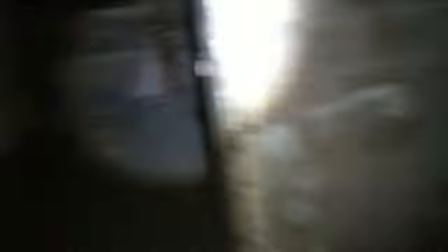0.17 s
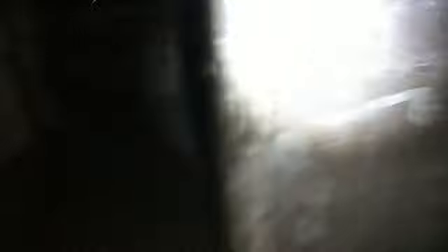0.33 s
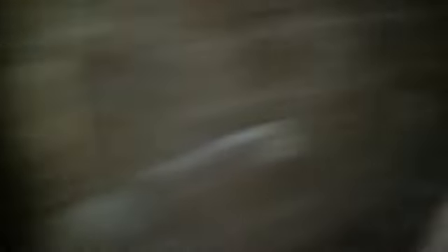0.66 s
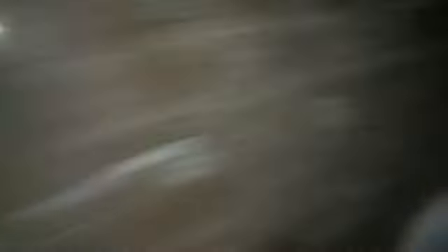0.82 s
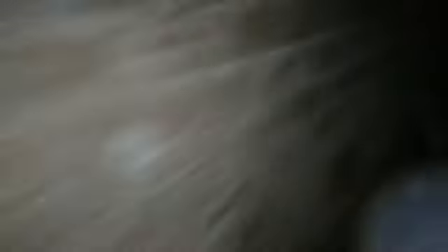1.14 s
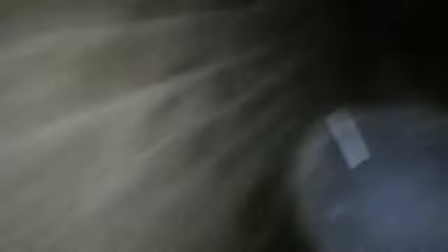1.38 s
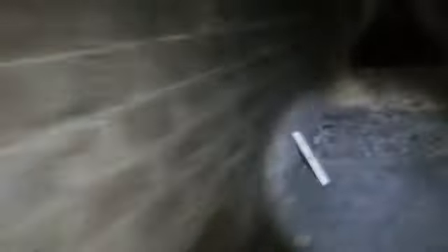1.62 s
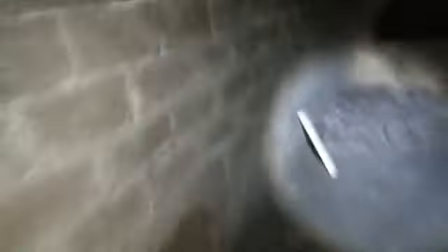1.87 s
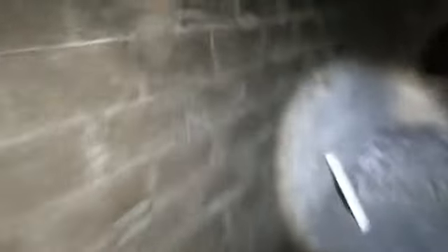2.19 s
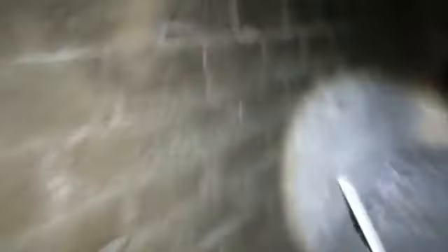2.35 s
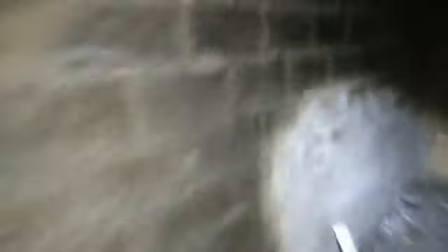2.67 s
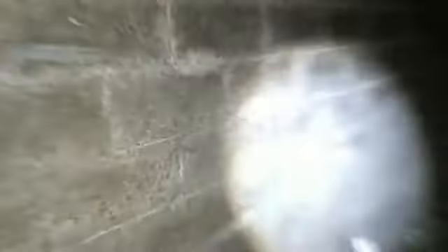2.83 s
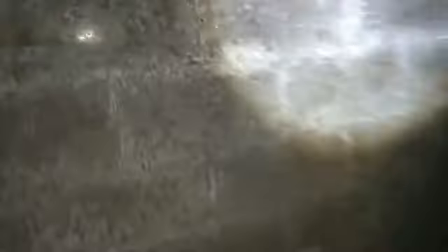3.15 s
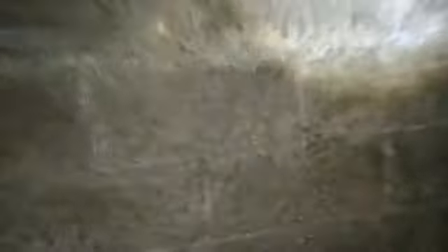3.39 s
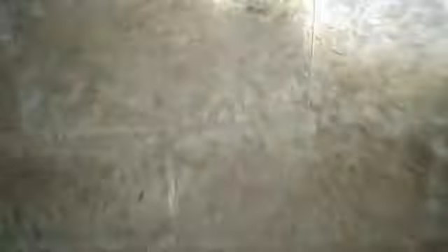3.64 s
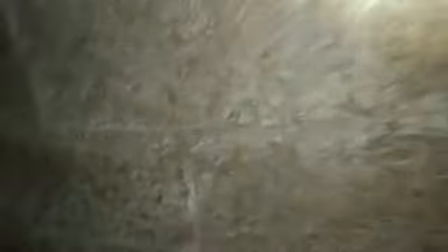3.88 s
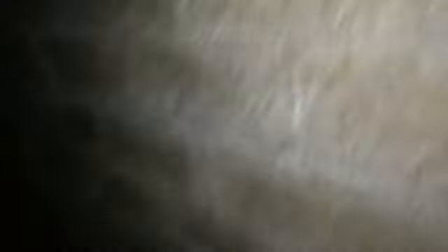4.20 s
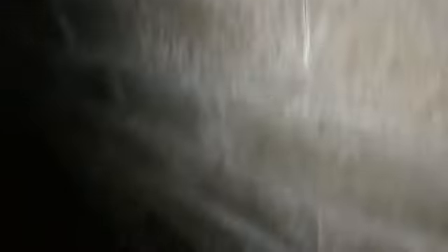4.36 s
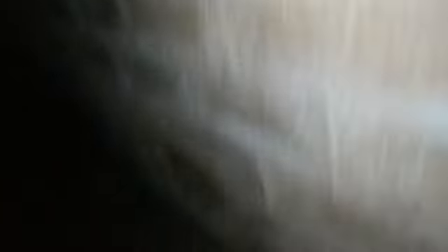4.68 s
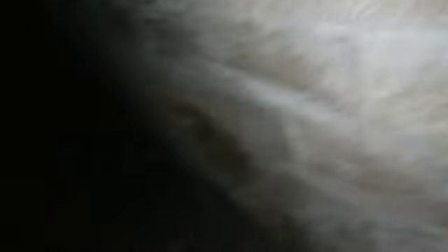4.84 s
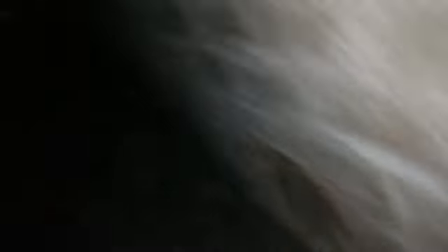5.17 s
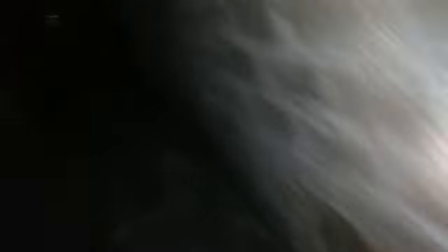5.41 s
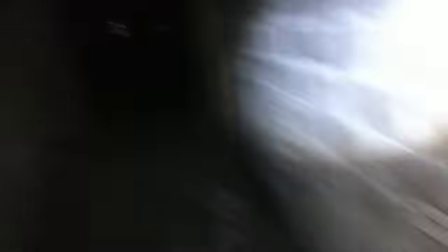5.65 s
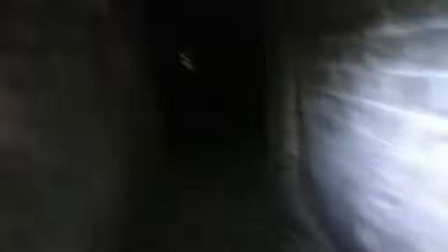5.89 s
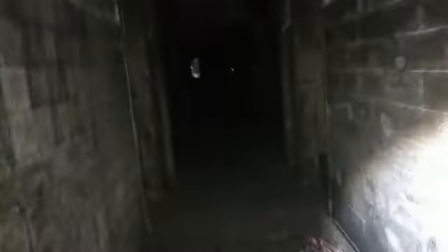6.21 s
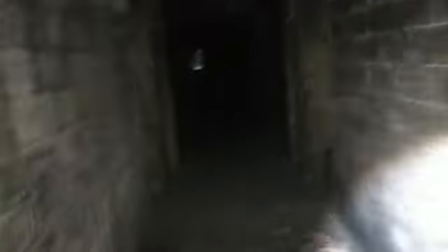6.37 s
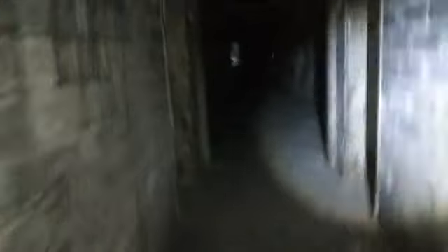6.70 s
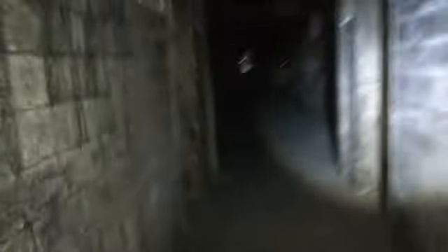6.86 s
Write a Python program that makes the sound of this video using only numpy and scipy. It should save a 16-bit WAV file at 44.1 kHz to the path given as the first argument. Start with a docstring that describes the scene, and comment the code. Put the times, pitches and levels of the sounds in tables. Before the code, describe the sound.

Close, handheld sound of someone walking slowly over grit in a hard, narrow passage. Soft sole scuffs and grit ticks alternate with gaps filled by low rumble and faint hiss. Steps get crisper and louder midway, with bright snaps and scrapes. In the last third, rough rubbing near the microphone takes over in irregular hollow strokes with airy whistles and a grainy rush, continuing to the end.

```python
"""Slow footsteps on a gritty concrete floor in a narrow brick corridor: bursts of filtered clicks make crunching
grit and scuffing soles; ringing bursts of noise make ticks of grit, low knocks and brief scuffs.
Later something rough rubs close to the microphone in uneven strokes: dense clicks through a hollow body's
resonances, with breathy whistles of narrow noise and long grainy hiss from the same bursts as the grit.
Under it all lie a noise rumble with wavering hums and a faint hiss; the corridor adds its echoes."""
import sys
import numpy as np
from scipy import signal
from scipy.fft import rfft, irfft
from scipy.io import wavfile
from scipy.ndimage import uniform_filter1d

SR = 44100
rng = np.random.default_rng(int(sys.argv[2]) if len(sys.argv) > 2 else 0)


def store_pcm(level_fs):
    """Save levels as 16-bit WAV."""
    pcm = np.round(np.clip(level_fs, -1, 1) * 32767).astype(np.int16)
    wavfile.write(sys.argv[1], SR, np.atleast_2d(pcm).T)


N = 310464


def from_db(db):
    """Amplitude factor of a level in dB."""
    return 10 ** (np.asarray(db) / 20)


def rms_one(x):
    """Scales a signal to rms 1."""
    return x / np.sqrt(np.mean(x ** 2) + 1e-20)


def at_hz(points, hz):
    """Reads a (frequency, value) table on a logarithmic frequency axis."""
    table_hz, values = np.transpose(points)
    return np.interp(np.log(hz), np.log(table_hz), values)


def in_time(rows):
    """Draws each column of a table as a line over the whole scene."""
    s, *columns = np.transpose(rows)
    return [np.interp(np.arange(N) / SR, s, column) for column in columns]


def band(x, low_hz, high_hz):
    """Keeps the range between two frequencies."""
    return signal.sosfilt(signal.butter(2, [low_hz, high_hz], "band", fs=SR, output="sos"), x)


def drift(corner_hz):
    """Slow random movement with rms 1: noise through two equal low-pass poles."""
    step = 20   # samples between computed points
    r = np.exp(-2 * np.pi * corner_hz * step / SR)
    noise = rng.standard_normal(N // step + 2002)
    slow = signal.lfilter([1], [1, -2 * r, r * r], noise)[2000:]   # skips the filter's start
    return np.interp(np.arange(N) / step, np.arange(len(slow)), rms_one(slow))


def grains(per_s, spread_db):
    """Random clicks of uneven size and either sign; rms 1."""
    size_db = spread_db * np.minimum(rng.exponential(1, N), 5)
    clicks = from_db(size_db) * rng.choice([-1, 1], N)
    return rms_one(clicks * (rng.random(N) < per_s / SR))


def coloured(x, spectrum):
    """Shapes a signal by a spectrum in dB; rms 1."""
    hz = np.maximum(np.fft.rfftfreq(N, 1 / SR), 1)
    return rms_one(irfft(rfft(x) * from_db(at_hz(spectrum, hz)), N))


def resonance(x, hz, width_hz):
    """One ringing mode: a two-pole filter, narrower ones ring longer."""
    r = np.exp(-np.pi * width_hz / SR)
    feed = np.array([1, 0, -1]) * (1 - r * r) / 2
    return signal.lfilter(feed, [1, -2 * r * np.cos(2 * np.pi * hz / SR), r * r], x + 1e-18)


def note(hz, waver_hz):
    """A tone whose pitch wavers a little; rms 1."""
    phase = 2 * np.pi * np.cumsum(hz + waver_hz * drift(5.36)) / SR
    return np.sqrt(2) * np.sin(phase)


# Low notes in the rumble: (time of the top [s], pitch [Hz], level at the top [dB],
# rise from 1/e [s], fall to 1/e [s])
HUM_NOTES = [(0.0, 69, -40.5, .2, 0.362), (0.9, 66, -50, 0.314, 0.21), (1.3, 52, -46.5, 0.33, 0.296),
             (1.75, 54.94, -46, .15, 0.22), (2.23, 51.92, -40.5, 0.143, 0.093),
             (2.75, 87.08, -48, 0.18, 0.212), (3.43, 87, -41, .3, 0.153), (3.9, 86, -52, 0.18, 0.18),
             (4.65, 80.2, -47.5, 0.21, 0.45), (5.31, 87, -43.5, 0.37, 0.16),
             (5.55, 70.05, -48, 0.144, 0.48), (5.74, 53, -44, 0.18, 0.27), (6.78, 69.07, -40, 0.26, 0.24)]


def humming():
    """Low wavering notes that swell and fade with bell-shaped envelopes."""
    t = np.arange(N) / SR
    hum = np.zeros(N)
    for top, hz, db, rise, fall in HUM_NOTES:
        swell = np.exp(-((t - top) / np.where(t < top, rise, fall)) ** 2)
        hum += from_db(db) * swell * note(hz, waver_hz=2.502)
    return hum


# Colour of the background noise: (frequency [Hz], relative level per Hz [dB])
BACKGROUND_COLOUR = [(15, -57), (25, -58), (47, 1), (74, -0.5), (100, -8), (117, -8.5), (169, -17),
                     (273, -25), (356, -30), (441, -27), (490, -31), (639, -29), (790, -31), (14300, -41.5)]
# Gains of its two parts: (time [s], rumble gain [dB], hiss gain [dB])
BACKGROUND_GAINS = [(0.0, -55, -37), (0.15, -55, -40), (0.23, -55, -43.5), (0.6, -50, -38.5),
                    (1.0, -50, -36), (1.7, -55, -40.5), (2.9, -47, -41), (3.2, -49, -41.5),
                    (3.45, -46, -39), (3.7, -56, -39), (4.4, -56, -38), (4.8, -50, -36.5),
                    (5.4, -51, -37.5), (6.2, -44, -41), (6.6, -47, -40), (6.86, -41, -39), (7.04, -46, -37)]


def background():
    """One coloured noise, split at 220 Hz into rumble and hiss that swell separately, plus the hum."""
    noise = coloured(rng.standard_normal(N), BACKGROUND_COLOUR)
    rumble = signal.sosfilt(signal.butter(2, 220, fs=SR, output="sos"), noise)
    hiss = noise - rumble
    rumble_db, hiss_db = in_time(BACKGROUND_GAINS)
    return from_db(rumble_db) * rumble + humming() + from_db(hiss_db) * hiss


# How long the brick corridor rings: (frequency [Hz], time to fall 60 dB [s])
CORRIDOR_DECAY = [(100, 0.523), (1000, 0.326), (4000, 0.413), (14000, 0.363)]


def corridor(x):
    """Dense echoes: bands of noise that die away, slowest in the bass and fastest near 1 kHz."""
    t = np.arange(SR) / SR
    edges_hz = 120 * 2. ** np.arange(8)
    tail = np.zeros(SR)
    for low_hz, high_hz in zip(edges_hz, edges_hz[1:]):
        t60 = at_hz(CORRIDOR_DECAY, np.sqrt(low_hz * high_hz))
        tail += band(rng.standard_normal(SR), low_hz, high_hz) * from_db(-60 * t / t60)
    tail *= np.minimum(t / 0.0101, 1)   # the echoes build up over 10.1 ms
    return signal.fftconvolve(x, tail / np.sqrt(np.sum(tail ** 2)))[:N]


# Breathy whistles within the rush: (start [s], length [s], pitch at the start [Hz], glide [Hz],
# level at the start [dB], change of level by the end [dB])
WHISTLE_EVENTS = [(4.888, .2, 1175, -40, -28, -20), (4.888, .18, 800, 50, -30, -17),
                  (5.06, .08, 770, 150, -44, 6), (4.89, 0.123, 1855, 15, -43, -15.5),
                  (4.891, 0.0654, 669, -10, -35.5, -8), (5.149, 0.1364, 900, 20, -29, -11.5),
                  (5.15, .16, 1775, -20, -38, 0.5), (5.2, .04, 1113, -10, -36, 3),
                  (5.297, 0.131, 1116, 27, -37, -5.5), (5.345, 0.0332, 1847, -240, -31, 0.5),
                  (5.45, 0.0634, 1322, 40, -31, -0.5), (5.725, 0.0685, 927, 8, -26, 2),
                  (5.744, .085, 2070, 20, -37, 0), (5.789, 0.176, 1234, 33, -30, -4),
                  (5.786, .085, 1402, -12, -30, 0), (5.851, .12, 2300, -70, -38, 0),
                  (5.7, .25, 3100, 130, -50, 3), (6.047, 0.1443, 960, 20, -29.5, -6.5),
                  (6.073, 0.0499, 1930, -10, -37, 5.5), (6.345, .063, 1180, 780, -33, -9),
                  (6.424, .057, 944, 5, -40, 10), (6.504, .044, 1185, 900, -31, 0),
                  (6.52, 0.0352, 2130, -80, -29, -2), (6.529, 0.068, 920, -37, -30, -2),
                  (6.662, 0.096, 2000, -30, -28.5, -10), (6.71, .21, 958, -28, -28, 1),
                  (6.82, .05, 1985, -45, -36, 0.5), (6.899, 0.083, 1257, 23, -31.5, -3),
                  (6.935, 0.0367, 1970, 16, -25, -6), (6.68, .29, 3200, -80, -49, -4)]
WHISTLE_WIDTH, WIDTH_PER_GLIDE = .03, .12   # noise width as a share of the pitch, and of the glide


def whistles():
    """Each is a narrow band of noise on a gliding pitch."""
    out = np.zeros(N)
    for start, length, hz, glide_hz, db, fade_db in WHISTLE_EVENTS:
        at, size = round(start * SR), round(length * SR)
        width_hz = WHISTLE_WIDTH * hz + WIDTH_PER_GLIDE * abs(glide_hz)
        r = np.exp(-np.pi * width_hz / SR)
        noise = rng.standard_normal((2, 20000))
        slow = signal.lfilter([1], [1, -2 * r, r * r], noise)[:, -size:]
        turn = 2 * np.pi * np.cumsum(hz + np.linspace(0, glide_hz, size)) / SR
        tone = rms_one(slow[0] * np.cos(turn) + slow[1] * np.sin(turn))
        level = from_db(db + np.linspace(0, fade_db, size))
        out[at:at + size] += tone * level * signal.windows.tukey(size, .2)
    return out


# Strokes close to the microphone: (time [s], level [dB], gain of the bright part [dB],
# ringing of the body against the slips [dB])
RUB_STROKES = [(4.884, -58, -3, -7), (4.891, -30, 0, -10), (4.93, -35, 4, -12), (4.98, -47, 5, -8),
               (5.06, -43, -12, -5), (5.135, -40, -8, -10), (5.154, -30.5, 3.5, -9), (5.256, -35, 6, -15),
               (5.275, -27, -6, -10), (5.31, -31, -10, -6), (5.37, -31.5, -2, -12), (5.444, -39, -5, -6),
               (5.452, -29, 3, -6.5), (5.62, -22.5, -4, -11), (5.69, -29, 0, -3), (5.73, -23.5, 0, -7.5),
               (5.966, -24.5, 1, -3), (5.975, -28, 1.5, -7), (6.023, -35, -4, -5), (6.031, -27, 2.5, -1),
               (6.122, -24, 2.5, -6), (6.25, -32, -4.5, -15), (6.338, -35, -1, -7), (6.354, -31, 3, -2),
               (6.5, -31.5, -8, -4), (6.515, -26.5, 1, -8), (6.545, -25, -2.5, -2), (6.592, -29.5, -1, -8),
               (6.65, -30.5, -6, -6), (6.67, -26, -3, -7), (6.706, -23, -1.5, -4.5), (6.866, -23.5, 0, -5),
               (6.88, -31, -4, -4), (6.892, -25.5, 3, -8), (6.966, -22.5, -1.5, 0), (6.977, -27.5, -2, -8),
               (7.04, -28, -7, -2)]
# Modes of the rubbed body: (frequency [Hz], width [Hz], level before colouring [dB])
BODY_MODES = [(634, 9.2, -12), (738.3, 10.7, 1), (817, 8.7, -1.5), (938.3, 7, -1), (986, 7.8, -14),
              (1104, 7.6, 6.5), (1163.8, 6.6, 12.5), (1257.8, 7.9, 17), (1396, 9.2, 8), (1467, 12, 10.5),
              (1673, 24.3, 9), (1800, 40, 4.5), (1910.7, 15.9, 12.5), (2033, 12, -3), (2122, 20.6, 8.5),
              (3000, 100, 6), (4210, 150, 3)]
# Colour of slips and body: (frequency [Hz], relative level per Hz [dB])
RUB_SPECTRUM = [(180, -59), (300, -25.5), (422, -18), (523, -17.5), (577, -10.5), (685, -9.5), (897, 0),
                (1030, -3.5), (1140, -2.5), (2080, -10), (2610, -23.5), (3100, -23), (4230, -31),
                (4680, -34), (9000, -33.5), (11700, -77), (19800, -120)]


def rubbing():
    """Dense slips excite a small hollow body whose modes swell and fade at random, now one, now another, while
    the strokes change in level, brightness and ringing."""
    level_db, bright_db, ring_db = in_time(RUB_STROKES)
    on = np.arange(N) / SR >= RUB_STROKES[0][0]   # silent before the first stroke
    slips = grains(4000., spread_db=2.5)
    body = np.zeros(N)
    for hz, width_hz, db in BODY_MODES:
        swing_db = 6 * drift(4.98)
        body += from_db(db + swing_db) * resonance(slips, hz, width_hz)
    body = coloured(body, RUB_SPECTRUM)
    # the modes share the same energy: evened out over 3000 samples
    body = body / np.sqrt(uniform_filter1d(body ** 2, size=3000) + 1e-9)
    rub = coloured(slips, RUB_SPECTRUM) + from_db(ring_db) * body
    dull = signal.sosfilt(signal.butter(1, 1350, fs=SR, output="sos"), rub)
    bright = rub - dull
    strokes = on * from_db(level_db) * (dull + from_db(bright_db) * bright)
    stutter = from_db(0.715 * drift(36.0))
    return stutter * (strokes + whistles())


# Short pitched sounds of the steps, ticks of grit, low knocks and brief scuffs: (time [s],
# peak of the ringing before the mix [dB], pitch [Hz], broad crack against that peak [dB],
# decay of the exciting burst to 1/e [ms])
SHORT_SOUNDS = [(0.274, -38, 715, -15, 2.5), (0.32, -40, 2500, -15, 8), (0.355, -36, 1000, -15, 5),
                (0.425, -39, 1500, -8, 2), (1.005, -29, 659, -4, 1.5), (1.028, -29, 1085, -12, 5.6),
                (1.065, -35, 1130, -8, 2.7), (1.13, -29, 2000, -20, 40), (1.153, -29, 900, -15, 3),
                (1.379, -43, 2000, -8, 2.3), (1.531, -29.5, 328.4, -18, 10), (1.558, -20, 4350, -12, 14),
                (1.609, -29.5, 860, -17, 4.3), (1.848, -28, 2500, -8, 1.42), (1.898, -29, 2430, -10, 2.45),
                (2.006, -35, 1850, -12, 3.7), (2.162, -34, 3130, -3, 1.9), (2.193, -30, 350, -14, 6),
                (2.298, -23.5, 1090, -10, 5.4), (2.552, -33, 9500, -20, 5), (2.572, -26, 1373, -11, 2),
                (2.576, -35, 1390, -25, 28), (2.813, -23, 2920, 2, 3.1), (3.44, -11.5, 2030, -24, 2.8),
                (3.825, -35, 4000, -8, 2.05), (3.888, -32, 2500, -2, 2.6), (3.99, -32.5, 7170, -20, 4.2),
                (4.026, -20, 13000, -12, 3), (4.049, -16, 6530, -16, 1.7), (4.057, -13, 7250, -8, 2.24),
                (4.065, -25, 1210, -8, 1.38), (4.114, -22, 2210, 4, 1.3), (4.174, -22, 3970, -2, 1.04),
                (4.325, -25, 803, -22, 11.2), (4.383, -26, 1500, -4, 1.6), (4.478, -22, 2200, -8, 4.3),
                (4.493, -26, 4170, 4, 2.35), (4.514, -17, 2200, -5, 2.1), (4.557, -12.5, 1570, -1, 1.5),
                (4.568, -23.5, 3300, -12, 1.64), (4.582, -22.5, 3500, -11, 1.5),
                (4.612, -25.5, 3320, -6, 2.05), (4.772, -21, 659, -20, 2.58),
                (5.036, -18.5, 4100, -20, 3.55), (5.105, -24, 4800, -4, 1.9),
                (5.221, -27.5, 3960, 4.5, 2.06), (6.214, -28.5, 335, 0, 5.3)]


def ticks_knocks_and_scuffs():
    """Each is a burst of noise ringing around its own pitch, plus a broad crack; long ones ring narrower."""
    out = np.zeros(N)
    t = np.arange(8000) / SR
    for s, peak_db, hz, crack_db, ms in SHORT_SOUNDS:
        noise = rng.standard_normal(len(t))
        width_hz = 0.798 * hz / (1 + ms / 7.4)
        burst = noise * np.exp(-1000 * t / max(ms, .3))
        ring = resonance(resonance(burst, hz, width_hz), hz, width_hz)
        crack = noise * np.exp(-t / 0.00135)
        sound = ring / np.abs(ring).max() + from_db(crack_db) * crack
        at = round(s * SR)
        out[at:at + len(t)] += from_db(peak_db) * sound
    return out


# Bursts of grit: shoes landing or dragging, and from 5.1 s also long grainy hiss of the rubbing:
# (time [s], rise [s], hold [s], 60 dB dying time of the fine layer [s], fine layer level before the mix [dB],
# and relative to it: coarse grit [dB], sole [dB], heel thud [dB])
GRIT_BURSTS = [(0.259, 0.0227, .06, .4, -51, 5, 4, -4), (0.4, .06, .05, .4, -51, -3, 2, -2),
               (0.998, .01, 0.135, 0.3542, -44.5, 2, 1, -0.5),
               (1.125, 0.04, 0.0082, 0.26, -36, -3.5, 1, -13.5),
               (1.338, 0.028, 0.018, 0.52, -50, -2, -2, -1.5),
               (1.523, 0.0108, 0.0097, 0.26, -38.5, -10.5, -3.5, -3.5),
               (1.553, 0.0053, 0.0037, 0.0935, -24, -17.5, -26.5, -19),
               (1.575, 0.0095, 0.0274, 0.6219, -38.5, -1, 0.5, -2),
               (1.824, 0.0205, 0.041, 0.75, -52.5, 0, 2, -2),
               (2.148, 0.0136, .02, 0.37, -43.5, -2, -2, -13.5),
               (2.186, 0.0094, 0.045, .5, -48, -3.5, 9, 11),
               (2.284, 0.037, 0.0142, 0.3558, -48, -7, 7.5, -0.5), (2.775, .03, .005, .1, -46, 2, 0, -8.5),
               (2.569, .01, 0.189, 3.27, -59.5, 3.5, 4, 3.5), (2.797, 0.0148, 0.0268, .5, -35, 7, 2, -7),
               (3.057, 0.032, 0.0093, 0.02, -54.5, -5, 3.5, -1.5),
               (3.372, 0.0071, 0.0152, 0.282, -22, 2, -11, -17.5),
               (3.435, 0.0048, 0.0079, 0.2347, -26, 1, -7.5, -17),
               (3.545, 0.041, 0.197, .5, -48, -8, -3.5, -8),
               (4.017, 0.0096, 0.044, 0.2843, -31, -8.5, -9, -18.5),
               (4.096, 0.0465, 0.0286, .5, -35, 0, -4, -20.5), (4.297, .015, .06, .5, -38, -10, 3, -7),
               (4.4, .08, .04, 0.1975, -43, 6, 2, -4), (4.549, 0.0043, 0.019, .5, -33.5, -15.5, -4, -24.5),
               (4.68, .03, .08, .4, -50, -15, 4, -10), (4.841, 0.021, 0.0095, 0.52, -41, -13, -7.5, -19.5),
               (5.028, 0.0078, 0.0051, 0.23, -33.5, -3, -14, -31.5),
               (5.099, 0.0174, 0.0098, 0.23, -34, -2, -16.5, -28),
               (5.149, 0.0147, 0.251, 0.56, -44.5, 0, -10, -12.5),
               (5.469, 0.029, 0.0098, 0.1436, -34.5, -5.5, -6.5, -1.5), (5.45, .02, .2, .5, -52, 6, 0, 6),
               (5.7, .05, .35, 1.02, -52.5, 5, -1, 2), (6.208, .004, .003, .04, -34, 0, -6, -4),
               (6.4, 0.182, 0.051, 0.55, -51, 2.5, -7.5, 1),
               (6.657, 0.0153, 0.35, 3.73, -44, -5.5, -5.5, -12)]
LAYER_LAG_S, LAYER_LONGER = 0.00366, 1.1673   # each lower layer starts later and dies more slowly


def burst_strength(layer):
    """Strength of all bursts in one layer: each rises, holds and dies away; their powers add."""
    t = np.arange(0, N, 16) / SR
    power = np.zeros(len(t))
    for s, rise, hold, dying, fine_db, *lower_db in GRIT_BURSTS:
        since = t - s - LAYER_LAG_S * layer
        t60 = dying * LAYER_LONGER ** layer
        fall_db = -60 * np.maximum(since - rise - hold, 0) / t60
        layer_db = fine_db + ([0] + lower_db)[layer]
        power += (np.clip(since / rise, 0, 1) * from_db(layer_db + fall_db)) ** 2
    return np.interp(np.arange(N) / SR, t, np.sqrt(power))


def grit_bursts():
    """Random clicks in four broad overlapping ranges: fine and coarse grains, sole and heel."""
    layers_hz = ((4330, 14500), (1834, 4500), (548, 2160), (149.4, 619))
    bursts = np.zeros(N)
    for layer, (low_hz, high_hz) in enumerate(layers_hz):
        grit = rms_one(band(grains(3500., spread_db=3.5), low_hz, high_hz))
        bursts += burst_strength(layer) * grit
    return from_db(0.75 * drift(51.0)) * bursts   # the level flickers slightly


def scene():
    """Mixes the direct sounds, their corridor echoes and the background; one channel."""
    grit = grit_bursts() + ticks_knocks_and_scuffs()
    rub = rubbing()
    direct = from_db(-2.5) * grit + rub
    echoes = corridor(from_db(-8.0) * grit + from_db(-15.5) * rub)
    return (direct + echoes + background())[None]


def record(dry):
    """The top is cut steeply at 14280 Hz by an elliptic low-pass."""
    cut = signal.ellip(14, .5, 85, 14280, fs=SR, output="sos")   # ripple .5 dB, stop band 85 dB down
    return signal.sosfilt(cut, dry)


dry = scene()
out = record(dry)
store_pcm(out)
```